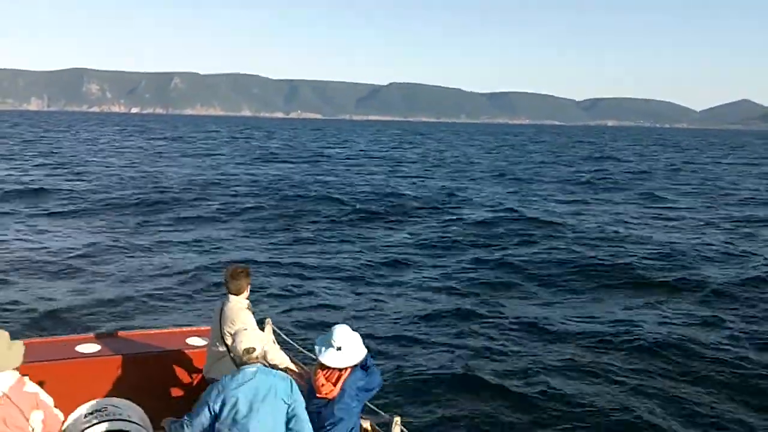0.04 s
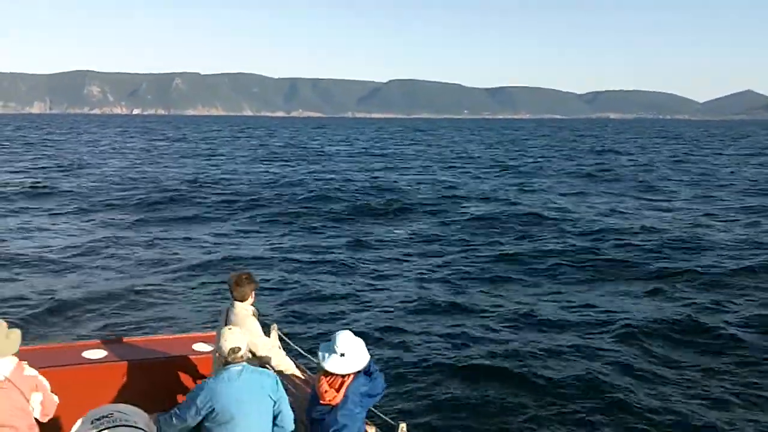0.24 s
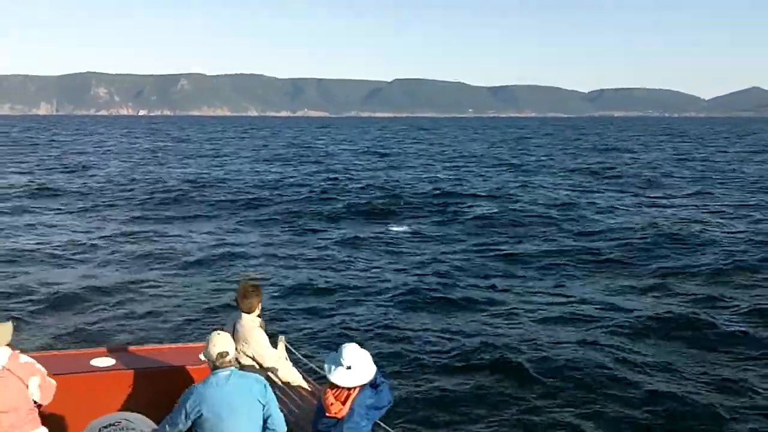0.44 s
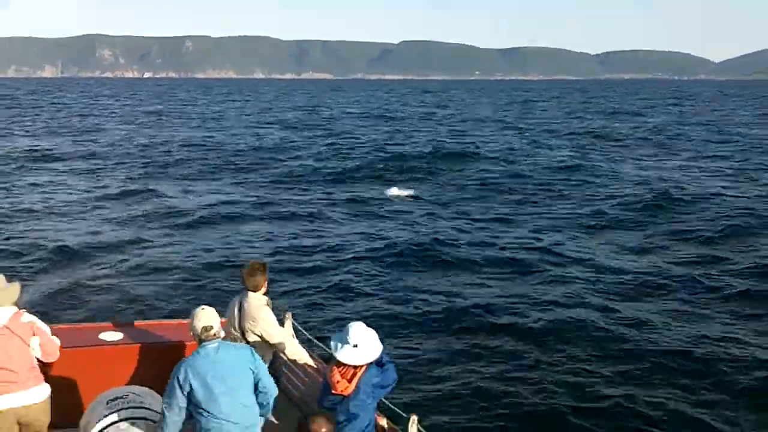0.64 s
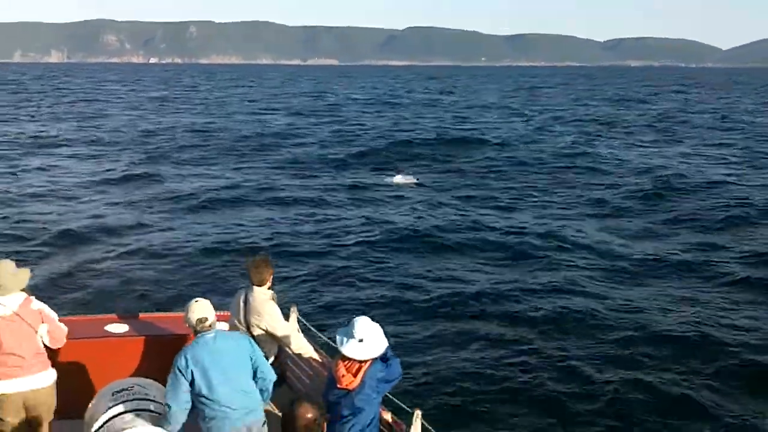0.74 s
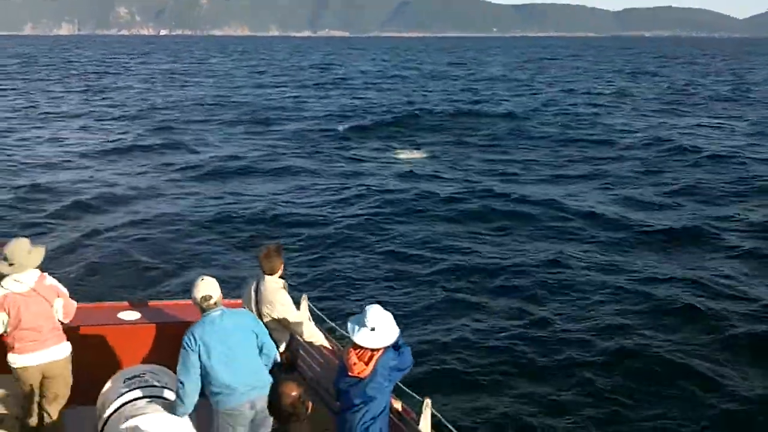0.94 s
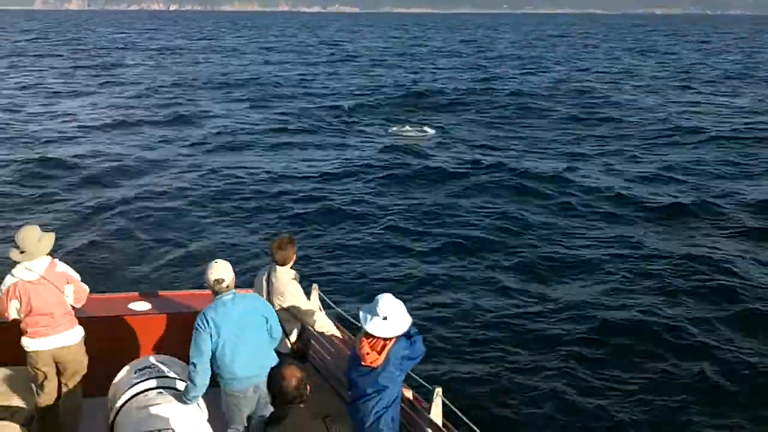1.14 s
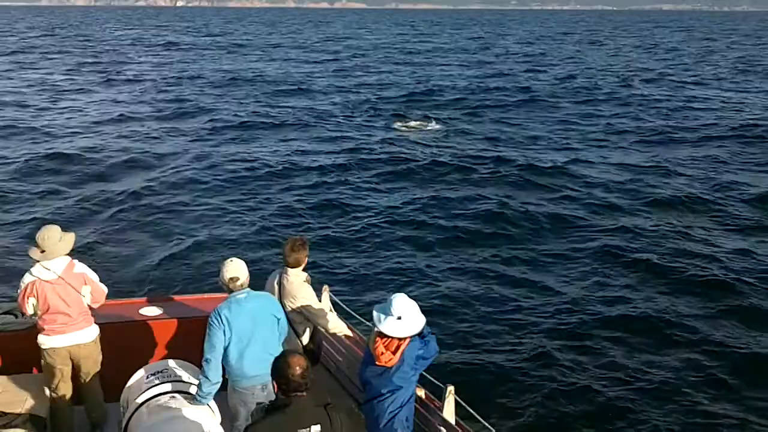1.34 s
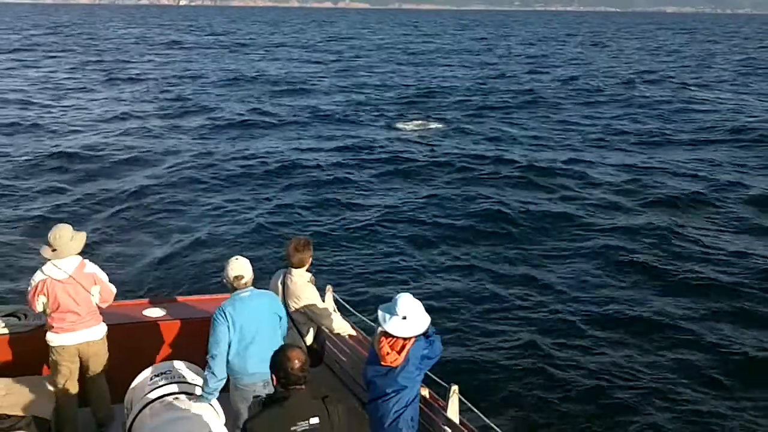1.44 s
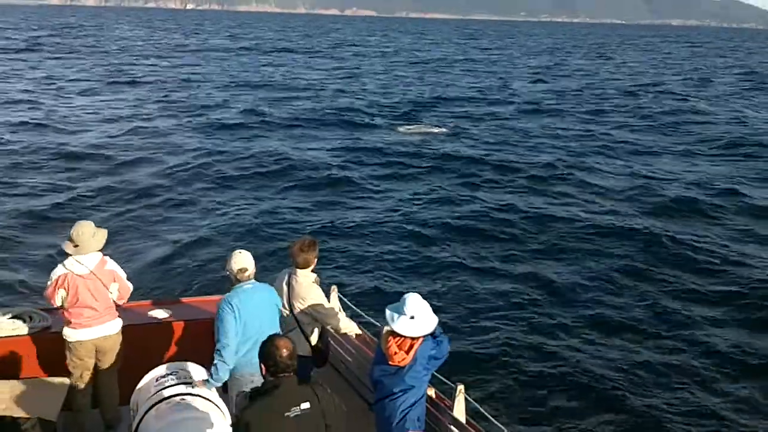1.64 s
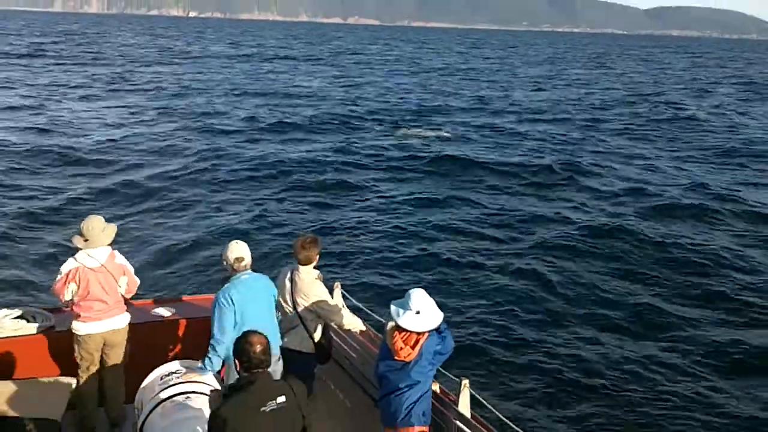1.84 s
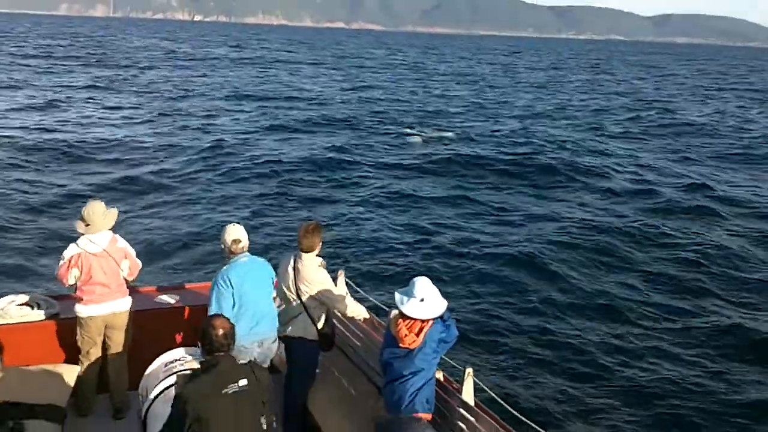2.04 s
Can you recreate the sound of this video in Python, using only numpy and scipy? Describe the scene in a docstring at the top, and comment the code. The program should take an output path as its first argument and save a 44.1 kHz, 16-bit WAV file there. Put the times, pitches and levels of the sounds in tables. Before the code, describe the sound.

Wind rumbles directly on a small microphone on an open boat deck, softly at first. From about 0.5 seconds uneven gusts thump and flutter, with a strong one near 1.3 seconds. Faint sea hiss and short spits of spray run behind. A thin, raspy wind whistle slides in pitch from 1.3 to 1.7 seconds. The hardest gust pops and sputters at 1.8 seconds, and the rumble carries on.

```python
"""A lumpy rumble of wind, right on a small camera microphone on a boat's open deck in choppy sea.
Gusts buffet the port with thumps and a rough flutter; the hardest one pops and sputters.
Behind them air and sea hiss with short spits, and for a moment the wind whistles over an edge.
Strong buffets push the microphone towards saturation and choke the hiss and the whistle."""
import sys
import numpy as np
from scipy.fft import rfft, irfft, next_fast_len
from scipy.io import wavfile
from scipy.ndimage import uniform_filter1d, map_coordinates

SR = 44100
rng = np.random.default_rng(int(sys.argv[2]) if len(sys.argv) > 2 else 0)


def file_out(sig):
    """Save sig as 16-bit WAV at sys.argv[1]."""
    # one column per channel
    cols = np.atleast_2d(sig).T
    # limit, then scale
    lim = np.clip(cols, -1, 1)
    pcm = np.round(lim * 32767).astype(np.int16)
    wavfile.write(sys.argv[1], SR, pcm)


N = 91904

# Big eddies and fine turbulence at the port. Each row: time in seconds, relative level in dB.
BUFFET_LEVELS = [(0, -32), (.07, -29.5), (.11, -34), (.2, -34.5), (.33, -28), (.41, -33), (.46, -22),
                 (.53, -19), (.62, -21.5), (.7, -19.5), (.75, -20), (.8, -19.5), (.83, -24), (.89, -18.5),
                 (.93, -30), (1.02, -21), (1.12, -18), (1.19, -26), (1.28, -12.5), (1.33, -27.5),
                 (1.385, -20.5), (1.45, -32.5), (1.54, -28.5), (1.58, -23), (1.73, -25.5), (1.81, -14.5),
                 (1.86, -19), (1.92, -17), (1.96, -36), (2, -29), (2.08, -18)]
FLUTTER_LEVELS = [(0, -50), (.05, -48.5), (.3, -54), (.47, -48), (.495, -34), (.515, -43), (.58, -35),
                  (.66, -37.5), (.71, -48), (.775, -39), (.8, -55), (.87, -31), (.91, -52.5), (.95, -43),
                  (.985, -51), (1.03, -50.5), (1.055, -42.5), (1.085, -38), (1.13, -30.5), (1.16, -50),
                  (1.22, -44.5), (1.258, -34.5), (1.335, -48.5), (1.365, -39), (1.43, -44), (1.53, -50.5),
                  (1.65, -42.5), (1.675, -48.5), (1.795, -46.5), (1.815, -26), (1.84, -30), (1.88, -41),
                  (1.96, -58.5), (2.02, -46.5), (2.08, -55.5)]
# Big, middling and fine eddies. Each row: frequency in Hz, relative spectral level in dB.
RUMBLE_SPECTRUM = [(16, 1), (30, 0), (48, -5), (70, -10.5), (110, -16.5), (200, -36.5), (400, -70.5),
                   (1200, -150)]
CHURN_SPECTRUM = [(40, -14), (70, -2), (95, 0), (130, -4.5), (200, -12.5), (300, -24.5), (500, -57.5),
                  (1200, -140)]
FLUTTER_SPECTRUM = [(90, -34.5), (170, -1), (250, 1), (400, -5.5), (700, -13.5), (1100, -24.5), (1800, -33),
                    (3000, -66), (6000, -120)]
# Single eddies striking the port. Each row: centre in seconds, peak in dB, width in seconds.
EDDY_THUMPS = [(.47, -19, 0.004877), (.5, -16, .0055), (.588, -11.5, .008), (.638, -10, 0.003366),
               (0.68, -9.5, 0.007412), (0.78, -8.5, 0.005075), (.852, -17, 0.00461), (.873, -9, 0.00987),
               (0.959, -9.5, 0.004179), (1.075, -9.5, 0.006714), (1.262, -10.5, 0.007552),
               (1.287, -10, 0.008646), (1.801, -9, 0.0030706), (1.839, -13.5, 0.004451),
               (1.903, -9.5, 0.009497)]
# Air breaking into the port. Each row: centre in seconds, level in dB, width in seconds.
PORT_POPS = [(.623, -24.5, 0.00019), (.943, -20, .0006), (1.129, -24.5, 0.0002554),
             (1.253, -13.5, 0.00018396), (1.259, -19.5, 0.00016), (1.81, 0.5, 0.00024973),
             (1.8172, -12, 0.00016), (1.83, -12, 0.00025), (1.834, -14, .0004), (1.863, -22.5, 0.00055),
             (1.848, -26.5, 0.00026), (1.893, -24.5, 0.00023)]
# Edge tones, a table each. Each row: time in seconds, pitch in Hz, fundamental in dB, octave in dB.
EDGE_TONES = [
    [(1.32, 2280, -52.5, -86), (1.331, 2192, -49.5, -73.5), (1.335, 1930, -57.5, -44.5),
     (1.36, 1750, -53.5, -48.5), (1.383, 1330, -35.5, -44.5), (1.4, 1016, -48.5, -48),
     (1.415, 1243, -37, -39.5), (1.428, 1431, -41, -57.5)],
    [(1.426, 2230, -40, -55), (1.44, 2441, -43, -60)],
    [(1.438, 1841, -44, -49), (1.452, 1791, -42.5, -46), (1.462, 2048, -55.5, -76),
     (1.475, 1981, -42, -52.5), (1.494, 1797, -40.5, -34.5), (1.51, 1951, -46.5, -57.5),
     (1.53, 2073, -40, -48.5), (1.542, 1937, -61, -66)],
    [(1.533, 1690, -58, -48.5), (1.545, 1799, -63.5, -41), (1.56, 2150, -62, -65),
     (1.571, 2294, -61, -67.5), (1.577, 2294, -59, -40.5), (1.588, 2080, -54, -51),
     (1.602, 1787, -46, -43.5)],
    [(1.613, 2670, -42, -60.5), (1.63, 2431, -39, -51), (1.636, 2093, -34.5, -43.5), (1.65, 1855, -49, -46),
     (1.673, 1531, -49.5, -52.5), (1.698, 1166, -52, -49), (1.716, 748.8, -44, -62.5)],
]
# Their higher overtones. Each row: frequency in Hz, level against the octave in dB.
EDGE_OVERTONES = [(2200, -2.5), (3100, -0.5), (5000, -10), (6200, -19), (8000, -32.5), (10000, -31),
                  (14000, -29)]
# Spits of spray and air. Each row: start in seconds, relative level in dB, seconds to fall 60 dB.
SPRAY_SPITS = [(0.026, -45, 0.05694), (.2225, -42, .07), (.290, -32, 0.05048), (0.304, -44, 0.11),
               (.368, -40, .04), (0.391, -46.5, 0.067), (0.54, -34, 0.03757), (0.5511, -24, 0.034144),
               (0.568, -45, 0.13), (.846, -41, .05), (1.066, -39.5, 0.059), (1.145, -40.5, 0.034),
               (1.195, -33, 0.07925), (1.466, -32.5, 0.027), (1.721, -48, 0.019), (1.9965, -35, 0.03666)]
# Air and sea behind the buffets. Each row: time in seconds, relative level in dB.
RUSH_LEVELS = [(0, -56), (.2, -60), (.32, -58), (.45, -58), (.53, -59), (.58, -51), (.68, -61.5),
               (.72, -63.5), (.76, -54), (.8, -57), (.83, -67.5), (.855, -53.5), (.91, -65.5), (.95, -55),
               (.99, -55), (1.03, -42), (1.07, -45), (1.1, -57.5), (1.19, -44.5), (1.26, -40.5),
               (1.28, -53.5), (1.305, -65.5), (1.38, -51.5), (1.55, -50), (1.7, -51), (1.77, -51.5),
               (1.83, -60), (1.88, -62), (1.95, -55), (2.08, -59)]
# The hiss on top of that rush. Each row: time in seconds, extra gain in dB.
HISS_LIFT = [(0, 0.5), (.25, 4.5), (.6, 4.5), (.9, 1), (1.03, -4.5), (1.15, -2), (1.25, -4), (1.4, 3.5),
             (1.68, 0), (1.77, 0.5), (2.08, 2)]
# Spray, the body of the rush and its hiss. Each row: frequency in Hz, relative spectral level in dB.
SPIT_SPECTRUM = [(400, -7), (1200, -13), (2000, 0), (3000, -6), (3700, 5.5), (4600, -1.5), (5400, -18.5),
                 (6500, -27), (8000, -38.5), (14000, -48)]
RUSH_SPECTRUM = [(200, -19.5), (500, 0.5), (1000, 1.5), (1500, 0.5), (2100, -0.5), (2600, -10.5),
                 (3400, -5.5), (5000, -60.5)]
HISS_SPECTRUM = [(1500, -33.5), (2500, -5), (3100, -7.5), (3600, -2.5), (4300, -3.5), (4950, -4.5),
                 (5400, -17.5), (6500, -20), (7500, -24), (9500, -30), (14000, -29.5), (15500, -40)]
# Dips of the microphone housing. Each row: centre in Hz, width in Hz, depth from 0 to 1.
HOUSING_DIPS = [(2700.2, 257.2, 0.85), (5473.3, 394.3, 0.71), (7827.4, 866, 0.84), (10971, 284.3, .8)]

TIME = np.arange(N) / SR


def buffeting():
    """Right on the port, big eddies rumble, smaller ones churn and the finest flutter at the crests."""
    (buffet_db,), (flutter_db,) = curves(BUFFET_LEVELS), curves(FLUTTER_LEVELS)
    rumble = evened(noise(RUMBLE_SPECTRUM), span_s=.06)
    churn = evened(noise(CHURN_SPECTRUM), span_s=.06)
    churn_db = -32.5 + .7576 * (buffet_db - buffet_db.mean())
    turbulence = evened(noise(FLUTTER_SPECTRUM), span_s=.019)
    patchy_db = 4.5 * wobble(160)
    crest_db = 2.5 * np.hypot(rumble, .5)
    flutter = unit(turbulence * amp(patchy_db + crest_db))
    return amp(buffet_db) * rumble + amp(churn_db) * churn + amp(flutter_db - .5) * flutter


def thumps():
    """Each eddy pushes the diaphragm between two suctions; hard ones overload the input, which buzzes."""
    overload_db, buzz_hz, buzz_s, tilt_db_per_octave = -14, 2394.7, .002192, -8.5
    push, crest = np.zeros(N), np.zeros(N)
    for centre, db, width in EDDY_THUMPS:
        age = TIME - centre
        spread = (age / width) ** 2
        push += amp(db) * (1 - .5 * spread) * np.exp(-.25 * spread)
        overload = np.clip((db - overload_db) / 2, 0, 1)
        crest += amp(db) * overload * np.exp(-(age / buzz_s) ** 4)
    phase = unsteady_phase(buzz_hz, jitter=.01, rate=1500)
    buzz = sum(amp(tilt_db_per_octave * np.log2(k)) * np.sin(k * phase) for k in range(1, 7))
    return push + amp(-35) * crest * buzz


def pops():
    """Air breaks into the port: a sharp-tipped pressure spike, then two weaker ones at uneven gaps."""
    gap_s, loss_db, tip_db, tip_s = .0024, 15, -26, .00002
    out = np.zeros(N)
    for centre, db, width in PORT_POPS:
        for k, stretch in enumerate(rng.uniform(.6094, 1.3, 3)):
            age = TIME - centre - k * stretch * gap_s
            spike = np.exp(-.5 * (age / width) ** 2)
            tip = amp(tip_db) * np.exp(-np.abs(age) / tip_s)
            out += amp(db - loss_db * k) * (spike + tip)
    return out


def whistle():
    """Wind over an edge on deck: a raspy tone whose pitch slides with the wind speed."""
    fade_s, flicker_db, rasp_depth = .0022, 2, .3803
    out = np.zeros(N)
    for rows in EDGE_TONES:
        hz, fundamental_db, octave_db = curves(rows)
        start, end = rows[0][0], rows[-1][0]
        gate = np.clip(np.minimum(TIME - start, end - TIME) / fade_s + .5, 0, 1)
        phase = unsteady_phase(hz, jitter=.016, rate=900)
        levels = [fundamental_db, octave_db]
        levels += [octave_db + np.interp(k * hz, *np.transpose(EDGE_OVERTONES)) for k in range(3, 8)]
        tone = np.sqrt(2) * sum(amp(db) * np.sin(k * phase) for k, db in enumerate(levels, 1))
        flicker = amp(flicker_db * wobble(220))
        rasp = 1 + rasp_depth * wobble(1400)
        out += gate * flicker * rasp * tone
    return out


def spits():
    """Spray and air spit in short, crackling bursts of hiss."""
    attack_s = .0006973
    envelope = np.zeros(N)
    for start, db, t60 in SPRAY_SPITS:
        age = np.maximum(TIME - start, 0)
        envelope += amp(db + 2 - 60 * age / t60) * (1 - np.exp(-age / attack_s))
    crackle = noise(SPIT_SPECTRUM) * amp(3.495 * wobble(900))
    return envelope * evened(crackle, span_s=.006595)


def rush():
    """Air and sea around the boat: a soft body and a grainy hiss that swell together."""
    (rush_db,), (lift_db,) = curves(RUSH_LEVELS), curves(HISS_LIFT)
    level_db = rush_db + 1.6585 * wobble(60)
    body = amp(level_db + 2) * noise(RUSH_SPECTRUM)
    grain_db = 2.997 * wobble(450)
    return body + amp(level_db + lift_db + grain_db) * noise(HISS_SPECTRUM)


def knock():
    """One tiny knock, buried under the wind and damped before it can ring."""
    start_s, hz, gain_db, t60_s = .46, 560.5, -27, .0002
    age = np.maximum(TIME - start_s, 0)
    envelope = amp(gain_db - 60 * age / t60_s) * (1 - np.exp(-age * hz))
    return envelope * np.sin(2 * np.pi * hz * age)


def amp(db):
    """Decibels to gain."""
    return 10 ** (np.asarray(db) / 20)


def unit(x):
    """Scale to rms 1."""
    return x / np.sqrt(np.mean(x ** 2) + 1e-20)


def curves(rows):
    """One value per sample for each column after the time."""
    times, *columns = np.transpose(rows)
    return [np.interp(TIME, times, column) for column in columns]


def wobble(rate):
    """A smooth random curve, rate knots a second."""
    knots = rng.standard_normal(int(N * rate / SR) + 4)
    return map_coordinates(knots, [TIME * rate])


def unsteady_phase(hz, jitter, rate):
    """Phase of a tone that wavers by the share jitter of its pitch."""
    return 2 * np.pi * np.cumsum(hz * (1 + jitter * wobble(rate))) / SR


def filtered(x, response):
    """Shape x with a gain given as a function of frequency."""
    size = next_fast_len(N + SR // 2)
    return irfft(rfft(x, size) * response(np.fft.rfftfreq(size, 1 / SR)), size)[:N]


def noise(spectrum):
    """Noise of rms 1 with a (Hz, dB) spectrum, rolled off below the first row."""
    freqs, db = np.transpose(spectrum)
    colour = lambda hz: amp(np.interp(np.log(hz + 1), np.log(freqs + 1), db))
    return unit(filtered(rng.standard_normal(N), lambda hz: colour(hz) * np.minimum(hz / freqs[0], 1)))


def evened(x, span_s):
    """Smooth out the swells of x, so that the gusts set the level."""
    power = np.abs(uniform_filter1d(x ** 2, max(int(span_s * SR), 8)))
    return unit(x / np.sqrt(power + .017))


def scene():
    """Out on deck the buffets load the microphone, which then passes less of the rush and whistle."""
    halving_pressure = .2583
    pressure = buffeting() + thumps() + pops()
    choke = 1 / (1 + (pressure / halving_pressure) ** 2)
    return (pressure + knock() + spits() + choke * (rush() + whistle()))[None]


def record(dry):
    """The camera microphone, in mono: treble dips from its housing, low cut, soft clip, band limit."""
    low_cut_hz, ceiling, top_hz = 10, 1.02, 15500

    def response(hz):
        dips = [1 - depth * np.exp(-((hz - centre) / width) ** 2) for centre, width, depth in HOUSING_DIPS]
        return np.prod(dips, axis=0) * hz / np.hypot(hz, low_cut_hz)

    housed = filtered(dry[0], response)
    clipped = housed / (1 + (housed / ceiling) ** 8) ** (1 / 8)
    return filtered(clipped, lambda hz: hz < top_hz)[None]


dry = scene()
out = record(dry)
file_out(out)
```